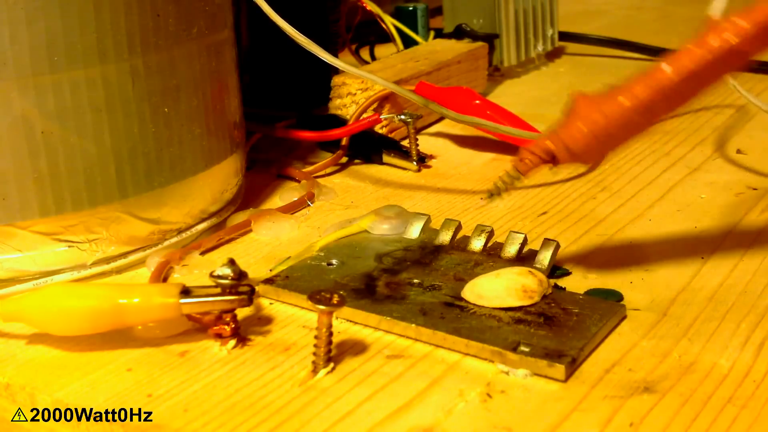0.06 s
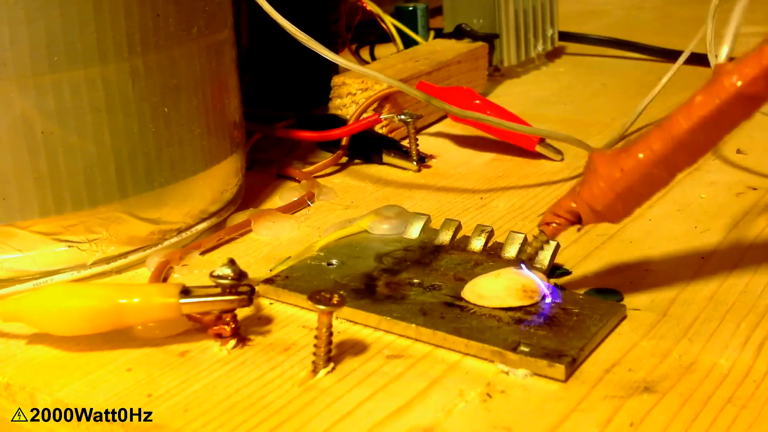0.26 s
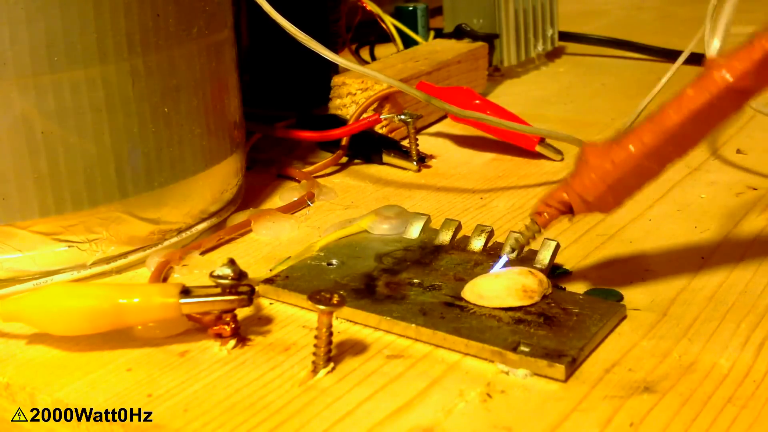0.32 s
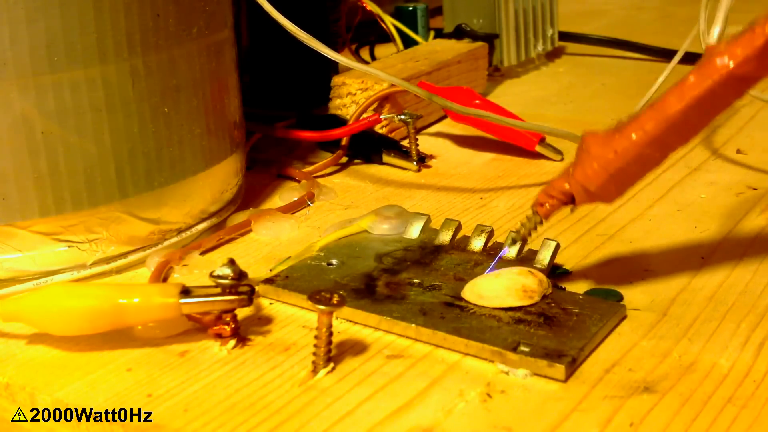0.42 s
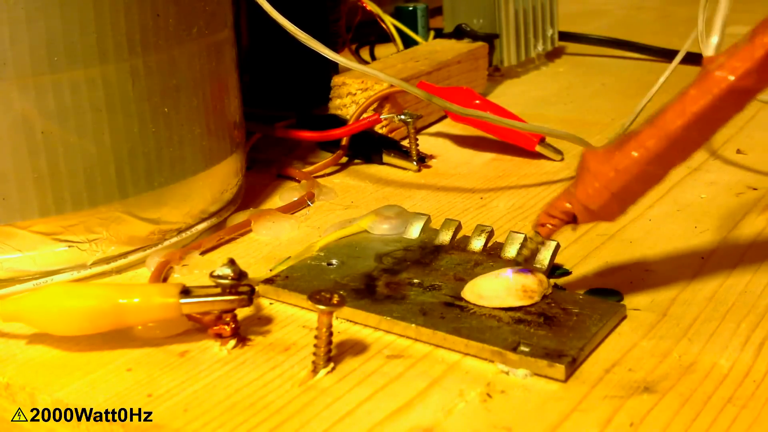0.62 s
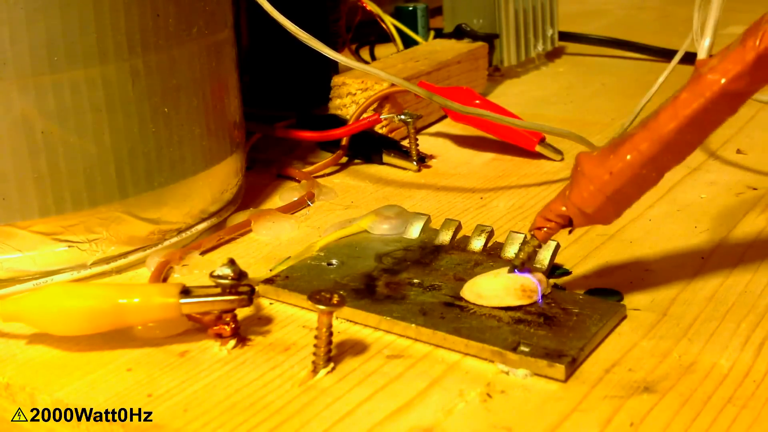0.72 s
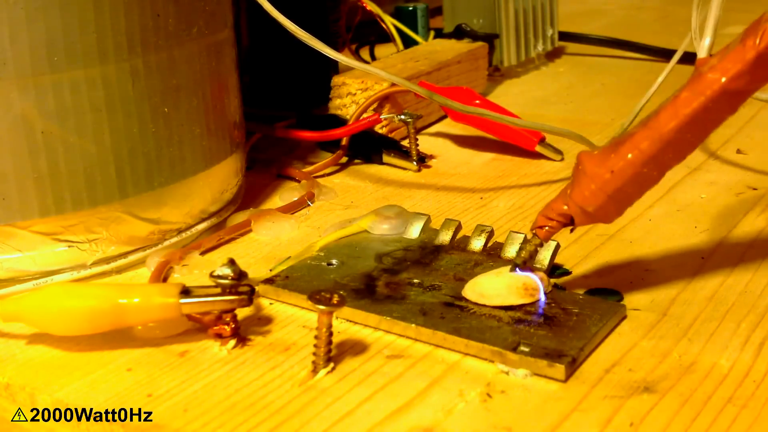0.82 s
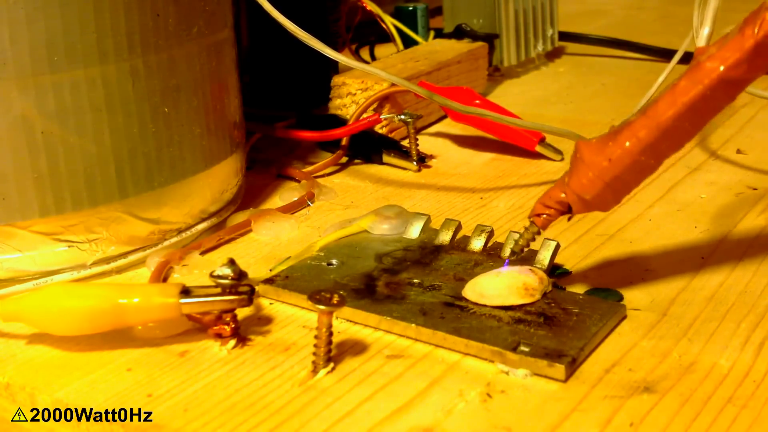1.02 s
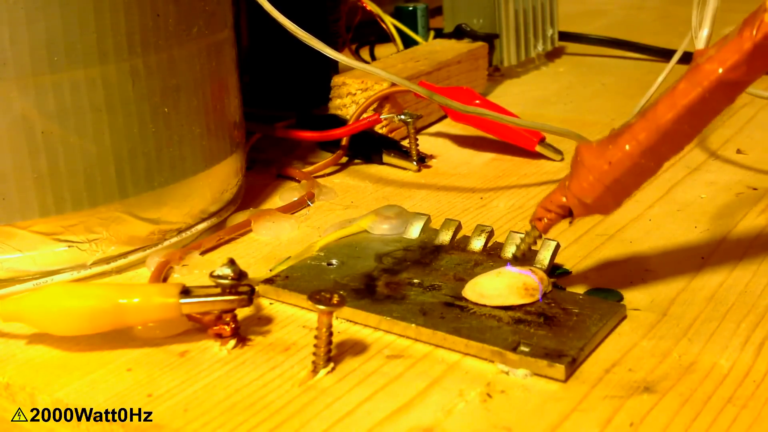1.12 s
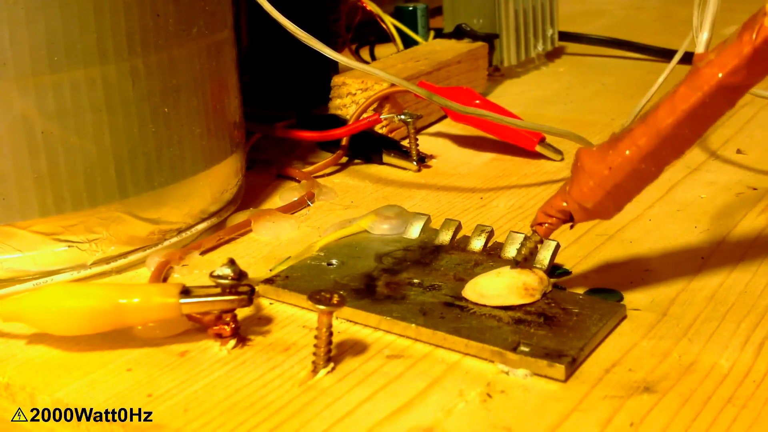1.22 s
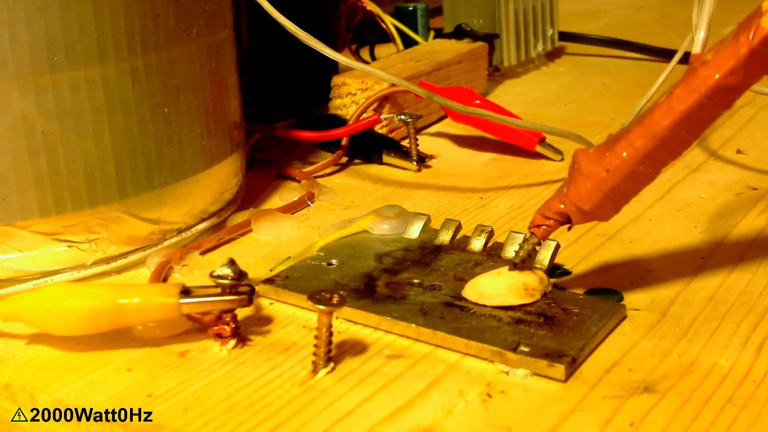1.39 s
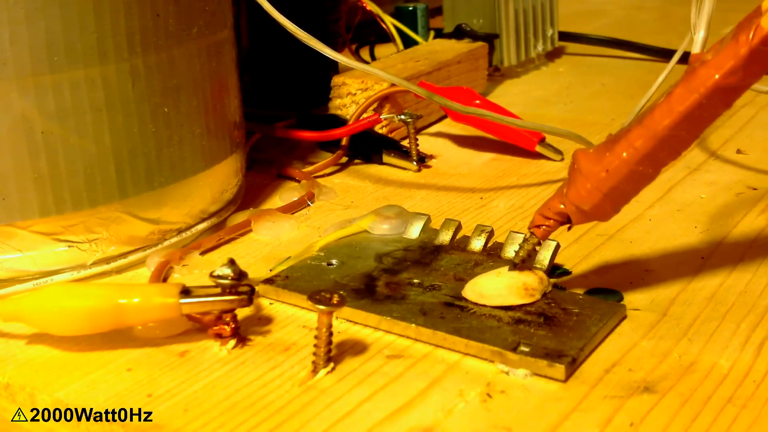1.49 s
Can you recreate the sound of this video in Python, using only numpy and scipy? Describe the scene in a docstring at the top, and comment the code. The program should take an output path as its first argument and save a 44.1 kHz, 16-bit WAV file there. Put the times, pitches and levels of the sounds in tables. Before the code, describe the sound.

High-voltage sparks snap close to the microphone on a workbench in a small room. A piercing whine flares briefly, then continues more softly under irregular crackling and sizzle, until a last sputter ends the arc.

```python
"""A workbench in a small room, the microphone close to a high-voltage probe lowered onto a metal plate.
The switching driver makes the discharge sing at its own rate, about 6 kHz, and the octave. Where the
arc will not hold it breaks into single snaps and bursts of sparks that skip driver cycles and echo off
plate and bench. Behind them lie a faint corona hiss, the coil's whine and the room's low rumble."""
import sys
import numpy as np
from scipy import signal
from scipy.fft import rfft, irfft, next_fast_len
from scipy.io import wavfile
from scipy.ndimage import uniform_filter1d, map_coordinates

SR = 44100
rng = np.random.default_rng(int(sys.argv[2]) if len(sys.argv) > 2 else 0)


def file_out(sig):
    """Save sig as 16-bit WAV at sys.argv[1]."""
    # one column per channel
    cols = np.atleast_2d(sig).T
    # limit, then scale
    lim = np.clip(cols, -1, 1)
    pcm = np.round(lim * 32767).astype(np.int16)
    wavfile.write(sys.argv[1], SR, pcm)


N = 68355
T = np.arange(N) / SR

# driver rate under changing load (time [s], rate [Hz])
DRIVER_RATE = [(0, 5934), (.222, 5938), (.226, 6290), (.275, 6283), (.36, 6280), (.43, 6322), (.55, 6335),
               (.585, 6281), (1.55, 6281)]
# single snaps (time [s], level [dB], thickness [0-1])
SINGLE_SNAPS = [(.0068, -48, .3), (.0735, -48, .5), (.078, -48, .5), (.1485, -50, .4), (.1725, -50, .4),
                (.2264, -15.5, 1), (.2306, -16, 1), (.236, -14.5, 1), (.2484, -16.5, .9), (.3105, -26, .8),
                (.4326, -20, .8), (.4998, -15.5, .9), (.5026, -17, 1), (.5066, -16.5, .9), (.5123, -16, .9),
                (.5157, -15, .9), (.6346, -16, .45), (.7925, -18, .4), (.8037, -19.5, .4), (.8161, -21, .3),
                (.8193, -20.5, .3), (.8208, -20, .3), (.8292, -20, .3), (.8366, -23, .2),
                (.9434, -21.5, .3), (.948, -22, .3), (.9488, -19, .3), (.9559, -22, .3), (.9574, -22.5, .3),
                (1.2072, -30, .2), (1.2114, -31, .3), (1.2125, -33, .4), (1.2133, -31, .4),
                (1.2267, -22, .2), (1.2273, -22, .2), (1.2294, -29, .3), (1.2635, -37, .6),
                (1.2655, -34, .6)]
# runs of sparks (start [s], length [s], typical gap [driver cycles], first level [dB],
# last level [dB], thickness [0-1])
SPARK_BURSTS = [(.189, .03, 3.1, -46, -44, .3), (.2698, .005, 2.6, -21, -25, .3),
                (.306, .004, 3.1, -32, -30, .1), (.341, .012, 3.1, -27, -23, .3),
                (.3765, .013, 6, -22, -19, .65), (.3898, .0195, 6.5, -18, -18, .65),
                (.4135, .012, 9.5, -18.5, -20, .7), (.428, .014, 6.1, -30, -34, .8),
                (.741, .006, 2.6, -19, -19.5, .2), (.8433, .0052, 9.5, -19.5, -22, .15),
                (.8511, .0093, 7.5, -20.5, -22, .15), (.8612, .0106, 7.5, -20, -20, .15),
                (.8809, .005, 13, -21, -20, .3), (.8895, .0028, 4, -22, -20, .2),
                (.8938, .0215, 7, -20, -21.5, .15), (.9212, .0042, 6.5, -22, -23, .2),
                (.9622, .0017, 4.5, -20, -23, .3), (1.181, .012, 3.1, -47, -47, .2),
                (1.219, .007, 3.6, -46, -35, .3), (1.228, .003, 4.5, -35, -40, .3)]
# a long, thick spark (frequency [Hz], level [dB])
THICK_SPECTRUM = [(180, -29), (500, -10), (1000, -2), (2000, -5), (3500, -0.5), (5500, -4.5), (8000, -12.5),
                  (10500, -12.5), (13000, -1.5), (14200, -10.5), (15200, -8), (16000, -23)]
# a short, thin spark (frequency [Hz], level [dB])
THIN_SPECTRUM = [(300, -46.5), (1000, -18), (2600, -4.5), (3800, -7.5), (4300, 0.5), (4900, -10.5),
                 (8500, -10), (10000, -11.5), (11500, -6), (14000, 4.5), (15200, 0.5), (16000, -24)]
# reflections off plate and bench (delay [s], level [dB])
BENCH_ECHOES = [(.00032, -7), (.0006, -13), (.00105, -17)]
# the steady arc (time [s], octave level [dB], fundamental relative to octave [dB])
ARC_LEVELS = [(.236, -75, -6), (.25, -49, -6), (.271, -46, -6), (.2745, -24, -8), (.295, -24, -7),
              (.33, -23, -6), (.338, -25, -6), (.3525, -27, -6), (.3535, -42, -5), (.37, -48, -4),
              (.44, -50, -4), (.48, -54, -2), (.53, -52, -6), (.575, -46, -9), (.59, -43, -7),
              (.72, -46, -6), (.739, -42, -8), (.75, -40, -8), (.79, -40, -7), (.85, -36, -7),
              (.915, -38, -8), (.928, -45, -6), (.965, -43, -6), (.985, -48, -5), (1.01, -45, -7),
              (1.175, -46, -6), (1.186, -42, -6), (1.19, -48, -5), (1.195, -37, -7), (1.206, -40, -7),
              (1.208, -65, -5), (1.212, -60, -5), (1.215, -43, -6), (1.23, -41, -7), (1.262, -47, -8),
              (1.268, -66, -3), (1.29, -80, -3)]
# the arc drops out for a few cycles at a time (start [s], length [s], share of time out [0-1], depth [0-1])
ARC_STUTTERS = [(.2715, .003, .4, 1), (.2917, .0003, 1, .6), (.3103, .0003, 1, .5), (.338, .015, .2, 1),
                (1.262, .005, .4, 1)]
# the tone at half the driver rate (time [s], level [dB], phase slip [rad])
HALF_RATE_LEVELS = [(1.222, -75, 1.3), (1.2315, -60, 1.3), (1.233, -45, 1), (1.243, -46, 1),
                    (1.246, -47, .2), (1.258, -48, .2), (1.264, -62, 1), (1.278, -62, 1), (1.283, -74, 1.3),
                    (1.295, -69, 2), (1.33, -72, 2), (1.35, -86, 1), (1.55, -90, 1)]
# corona whine as the tip approaches (start [s], length [s], level [dB], relative octave level [dB])
CORONA_SPURTS = [(0.013, 0.0036, -60, 0), (0.02, 0.0058, -55, -5), (.078, 0.028, -52.5, -3.5),
                 (0.1155, 0.01, -56, -3), (0.1287, 0.014, -57.5, 2), (.149, 0.0223, -52, -1.5),
                 (0.172, 0.04, -53, 1.5)]
# the coil's own whine (time [s], level [dB], relative octave level [dB])
COIL_LEVELS = [(0, -68, -9), (.05, -63, -8), (.1, -74, -8), (.22, -68, -8), (1.27, -66, -8),
               (1.35, -65, -9), (1.43, -70, -4), (1.53, -63, -14), (1.55, -64, -15)]
# corona hiss (time [s], level [dB])
HISS_LEVELS = [(0, -60.5), (.07, -59), (.1, -61), (.18, -61.5), (.195, -50), (.25, -46), (.37, -48),
               (.44, -44), (.48, -53), (.53, -46), (.58, -52.5), (.61, -58.5), (.72, -57.5), (.735, -51.5),
               (.79, -51), (.85, -45.5), (.93, -42.5), (.98, -52.5), (1.01, -58.5), (1.17, -62),
               (1.215, -53.5), (1.23, -41), (1.265, -56), (1.29, -73), (1.55, -89)]
# colour of the corona hiss (frequency [Hz], level [dB])
HISS_SPECTRUM = [(710, -40), (1200, -8.5), (3430, -1.5), (5970, -7.5), (6230, -8.5), (9930, -13.5),
                 (13000, 0.5), (15500, -11), (16000, -47)]
# the room's reverberation (frequency [Hz], time to fall 60 dB [s])
ROOM_DECAY = [(300, 0.038), (3000, 0.084), (8000, 0.15), (15000, 0.13)]
# low room rumble (frequency [Hz], level [dB])
RUMBLE_SPECTRUM = [(35, -80), (60, -27), (109, -5.5), (140, -4), (231, -2.5), (306, -0.5), (511, -12),
                   (554, -10), (786, -9.5), (1000, -16), (1160, -18), (1380, -28), (1500, -65),
                   (1950, -29.5), (3300, -120)]
# steady room hiss (frequency [Hz], level [dB])
AIR_SPECTRUM = [(500, 4), (1200, 14), (5000, 6.5), (10000, -3), (16000, -43)]


def sparks():
    """Each spark is a blend of a thick and a thin click, heard close up with the bench's echoes."""
    times, db, thickness = spark_strikes()
    thick = signal.fftconvolve(impulses(times, amp(db) * thickness), click(THICK_SPECTRUM))[:N]
    thin = signal.fftconvolve(impulses(times, amp(db) * (1 - thickness)), click(THIN_SPECTRUM))[:N]
    echoing = thick + amp(-7) * thin  # a short spark close to the plate echoes less
    echoes = sum(amp(level) * np.roll(echoing, round(delay * SR)) for delay, level in BENCH_ECHOES)
    return filtered(thick + thin + amp(-6) * bench_scatter(echoing) + echoes, hollow_notch)


def spark_strikes(gap_spread=.24, late_cycles=.35, size_spread_db=1.5, charge_growth=.35):
    """Sparks keep to the driver; in a burst each waits whole cycles and is bigger after a longer wait."""
    cycles = driver_cycles()
    nearest_cycle = lambda time: np.round(np.interp(time, T, cycles))
    times, db, thickness = np.transpose(SINGLE_SNAPS)
    strikes = [np.transpose([np.interp(nearest_cycle(times), cycles, T), db, thickness])]
    for start, length, typical_gap, first_db, last_db, thickness in SPARK_BURSTS:
        gap_draw, size_draw, late_draw = rng.standard_normal((3, 256))
        gaps = np.maximum(np.round(typical_gap * np.exp(gap_spread * gap_draw)), 1)
        jitter = late_cycles * thickness * late_draw  # a thick spark strikes loosely within its cycle
        times = np.interp(nearest_cycle(start) + np.cumsum(gaps) - gaps[0] + jitter, cycles, T)
        db = first_db + (last_db - first_db) * (times - start) / length
        db += size_spread_db * size_draw + charge_growth * 20 * np.log10(gaps / typical_gap)
        burst = np.transpose([times, db, np.full_like(times, thickness)])
        strikes.append(burst[times <= start + length])
    return np.concatenate(strikes).T


def driver_cycles():
    """Switching cycles of the driver, counted from the start."""
    return np.cumsum(np.interp(T, *np.transpose(DRIVER_RATE))) / SR


def hollow_notch(hz, centre_hz=4200, half_width_hz=170, depth=.8):
    """A narrow dip that makes the sparks sound hollow."""
    damping = 2j * hz * half_width_hz
    return 1 - depth * damping / (centre_hz ** 2 - hz ** 2 + damping)


def bench_scatter(x, count=6, t60_s=.008):
    """Diffuse echoes off the things on the bench, a little different as the tip moves."""
    t = T[:SR // 50]
    tail_in_use = (T * 40).astype(int) % count
    tails = rng.standard_normal((count, len(t))) * amp(-60 * t / t60_s) * (t > .0004)
    return sum(signal.fftconvolve(x * (tail_in_use == k), tail / np.linalg.norm(tail))[:N]
               for k, tail in enumerate(tails))


def whine(octave_lead_rad=.9):
    """Coil, arc and corona spurts all sing at the driver rate and its octave."""
    phase = 2 * np.pi * driver_cycles()
    fundamental, octave = coil() + arc() + corona_spurts()
    tone = fundamental * np.cos(phase) + octave * np.cos(2 * phase + octave_lead_rad)
    return np.sqrt(2) * (tone + half_rate_tone(phase))


def arc(flutter_db=.84, flutter_hz=137.2, stutter_hz=3550):
    """Fundamental and octave amplitudes of the arc, which flutters and briefly drops out."""
    octave_db, relative_db = curves(ARC_LEVELS)
    octave_db += flutter_db * wobble(flutter_hz)
    chance = rng.random(N)[(T * stutter_hz).astype(int)]
    loss = sum(depth * ((T > start) & (T < start + length) & (chance < share))
               for start, length, share, depth in ARC_STUTTERS)
    octave = amp(octave_db) * uniform_filter1d(1 - loss, size=7)
    return np.array([octave * amp(relative_db), octave])


def half_rate_tone(phase):
    """Every second cycle is stronger, so half the driver rate sounds, with its third harmonic."""
    db, slip_rad = curves(HALF_RATE_LEVELS)
    slip = slip_rad * wobble(rate_hz=350)
    third = amp(-10 + .4 * (db + 46)) * np.sin(3 * phase / 2 + slip)  # brighter when louder
    return amp(db + 2.5 * wobble(rate_hz=400)) * (np.sin(phase / 2 + slip) + third)


def corona_spurts(ramp_s=.0006):
    """Fundamental and octave amplitudes of the brief corona whines as the tip approaches."""
    amplitudes = np.zeros((2, N))
    for start, length, db, octave_db in CORONA_SPURTS:
        gate = np.clip(np.minimum(T - start, start + length - T) / ramp_s, 0, 1)
        amplitudes += np.outer(amp([db, db + octave_db]), gate)
    return amplitudes


def corona_hiss():
    """Corona fizzes round the tip, its level flickering."""
    return amp(curves(HISS_LEVELS)[0] + 2 * wobble(rate_hz=150)) * noise(HISS_SPECTRUM)


def coil():
    """Fundamental and octave amplitudes of the coil's faint, wavering whine."""
    db, octave_db = curves(COIL_LEVELS)
    db += 1.1 * wobble(rate_hz=59.7)
    return amp([db, db + octave_db])


def room_reverb(x):
    """The small room answers, each frequency dying at its own speed."""
    hz, t, bands = signal.stft(rng.standard_normal(SR // 2), SR, nperseg=256)
    decay = amp(-60 * t / along(ROOM_DECAY, hz)[:, None])
    tail = signal.istft(bands * decay, SR, nperseg=256)[1]
    return signal.fftconvolve(np.pad(x, (60, 0)), tail / np.linalg.norm(tail))[:N]


def room_tone(rumble_db=-60.5, air_db=-71):
    """Steady rumble and hiss, far behind the bench."""
    return amp(rumble_db) * noise(RUMBLE_SPECTRUM) + amp(air_db) * noise(AIR_SPECTRUM)


def amp(db):
    """Decibels to amplitude."""
    return 10 ** (np.asarray(db) / 20)


def along(points, hz):
    """Interpolate (frequency [Hz], value) points on a log axis."""
    knots_hz, values = np.transpose(points)
    return np.interp(np.log(hz + 1), np.log(knots_hz + 1), values)


def curves(rows):
    """One value per sample for each column after the time; -120 before the first row, held after the last."""
    times, *columns = np.transpose(rows)
    return [np.interp(T, times, column, left=-120) for column in columns]


def wobble(rate_hz):
    """A smooth random curve with rate_hz knots a second."""
    return map_coordinates(rng.standard_normal(int(N * rate_hz / SR) + 4), [T * rate_hz])


def filtered(x, response):
    """x through a frequency response."""
    size = next_fast_len(N + SR // 2)
    return irfft(rfft(x, size) * response(np.fft.rfftfreq(size, 1 / SR)), size)[..., :N]


def noise(spectrum):
    """Coloured noise of rms 1."""
    x = filtered(rng.standard_normal(N), lambda hz: amp(along(spectrum, hz)))
    return x / np.sqrt(np.mean(x ** 2))


def click(spectrum, size=1024):
    """The minimum-phase pulse with this spectrum, peak 1."""
    magnitude = amp(along(spectrum, np.fft.rfftfreq(size, 1 / SR)))
    cepstrum = irfft(np.log(np.maximum(magnitude, 1e-4)))
    cepstrum[1:size // 2] *= 2
    cepstrum[size // 2 + 1:] = 0
    pulse = irfft(np.exp(rfft(cepstrum)))
    return pulse / np.abs(pulse).max()


def impulses(times, gains):
    """Impulses placed between samples as windowed sincs."""
    taps = np.floor(times * SR)[:, None] + np.arange(-7, 9)
    offset = taps - times[:, None] * SR
    weights = gains[:, None] * np.sinc(offset) * np.cos(np.pi * offset / 16) ** 2
    return np.bincount(taps.astype(int).ravel(), weights.ravel(), N)[:N]


def scene(reverb_db=-8):
    """Sparks and whine up close, hiss and room behind, in mono."""
    crackle = sparks()
    background = room_tone()
    return (crackle + amp(reverb_db) * room_reverb(crackle) + whine() + corona_hiss() + background)[None]


def record(dry, lead_rad=.7, bass_cut_hz=24.4, top_hz=15300):
    """The microphone cuts the deep bass and leads in phase; the recorder's band limit trims the top."""
    microphone = lambda hz: np.exp(1j * lead_rad) * hz ** 2 / (hz ** 2 + bass_cut_hz ** 2)
    band_limit = lambda hz: np.clip((top_hz + 200 - hz) / 300, .05, 1) ** 1.5 * (hz < top_hz + 900)
    return filtered(dry, lambda hz: microphone(hz) * band_limit(hz))


dry = scene()
out = record(dry)
file_out(out)
```